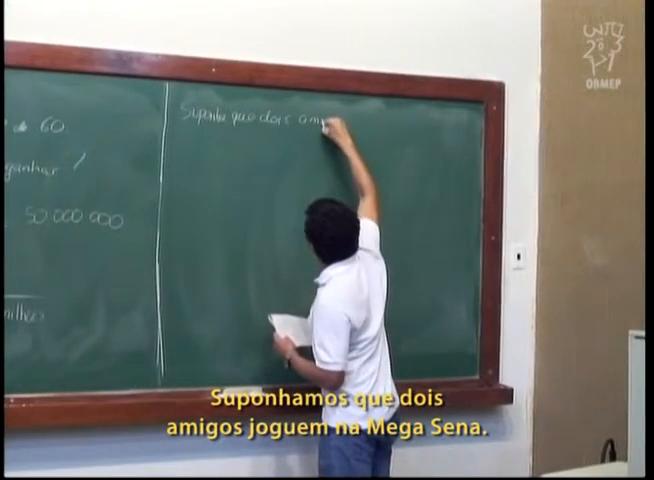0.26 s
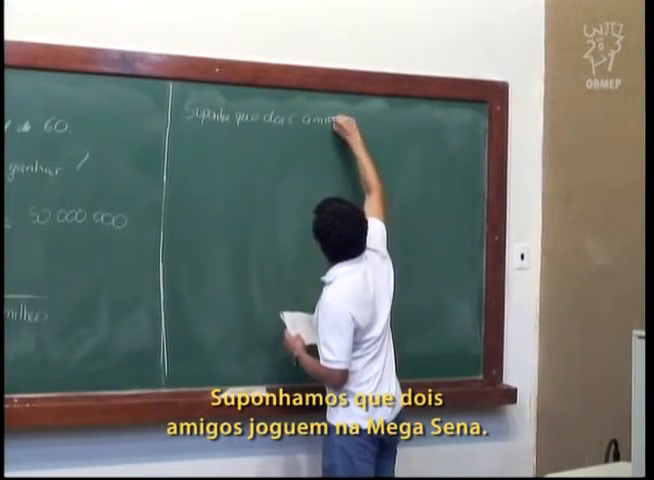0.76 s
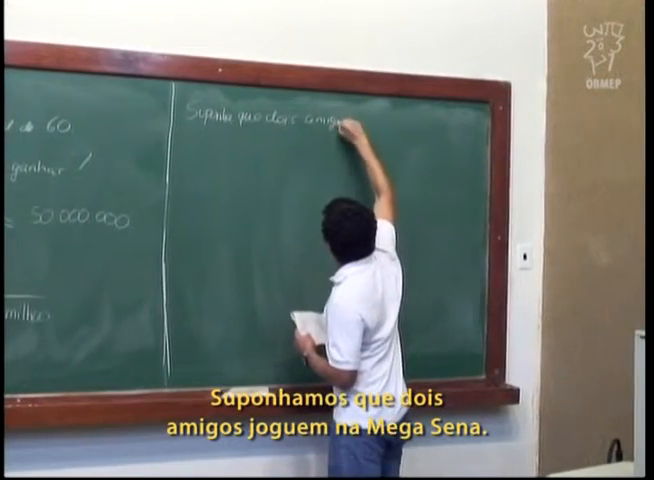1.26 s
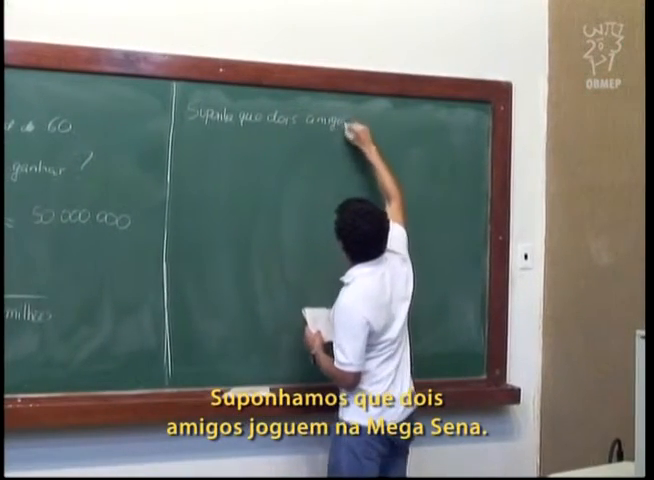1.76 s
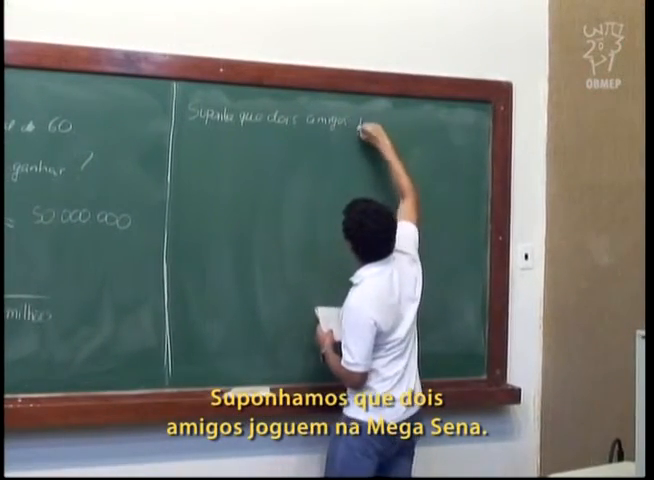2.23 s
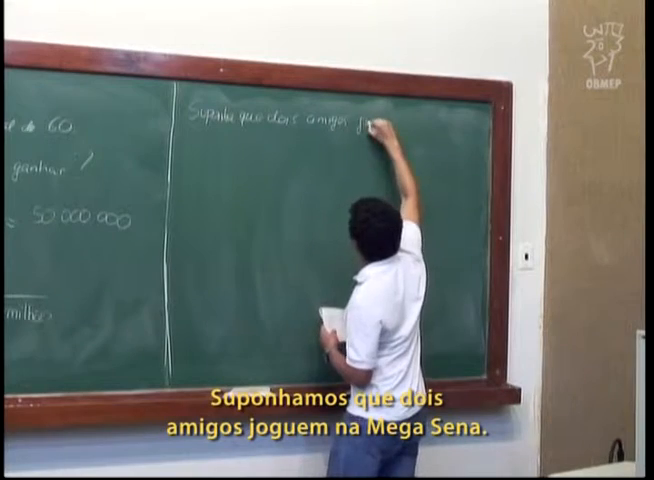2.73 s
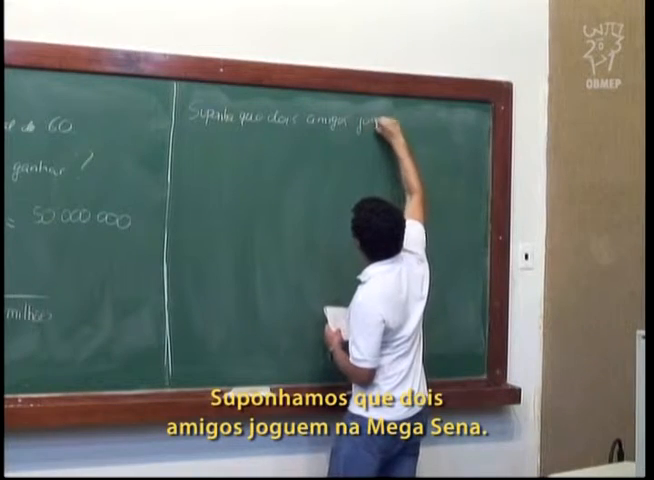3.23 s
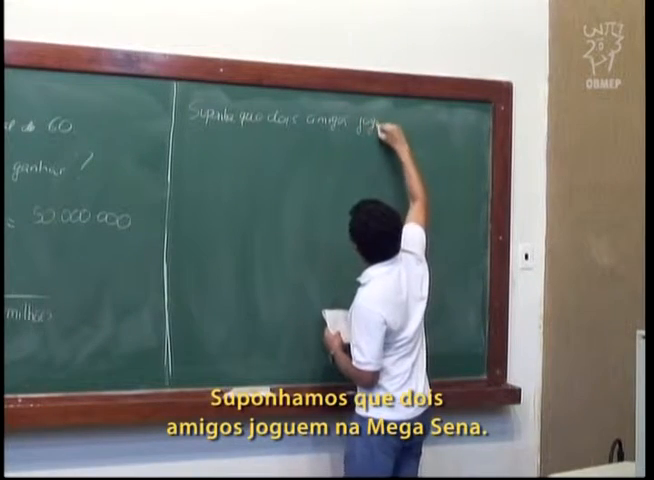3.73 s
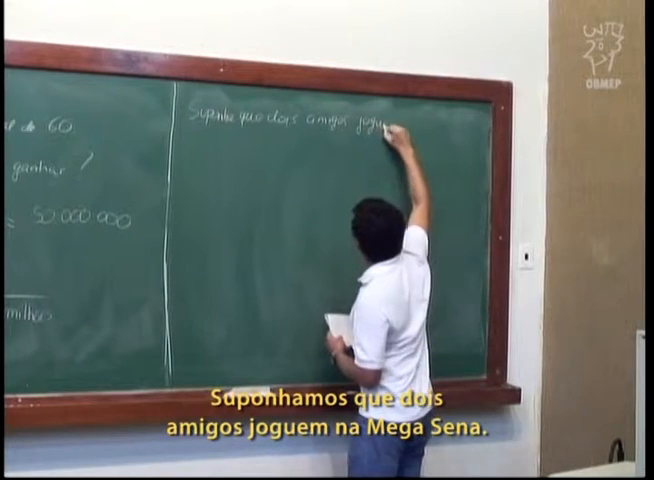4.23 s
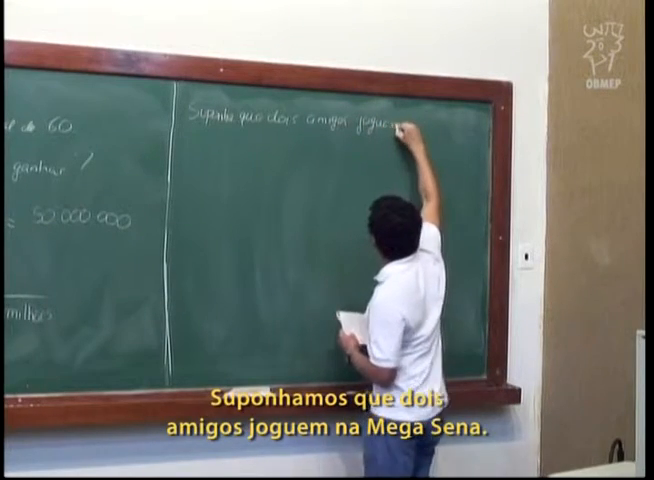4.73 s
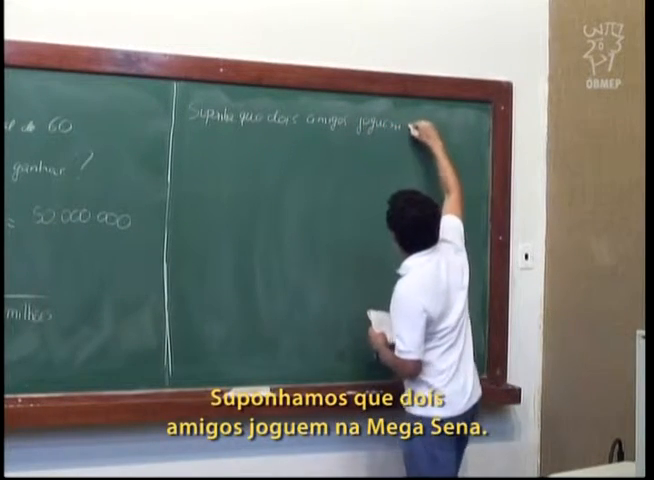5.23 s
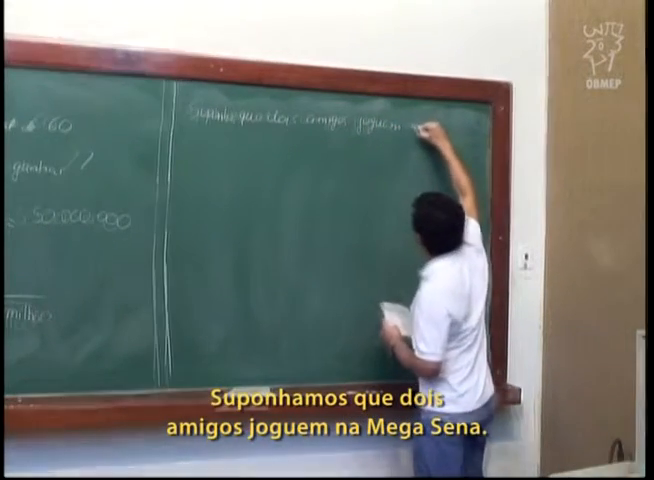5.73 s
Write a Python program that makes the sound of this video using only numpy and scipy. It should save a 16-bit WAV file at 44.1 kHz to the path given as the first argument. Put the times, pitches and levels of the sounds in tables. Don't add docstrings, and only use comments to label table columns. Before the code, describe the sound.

Chalk writes on a wall-mounted board in short dry scratches, with hard little knocks between strokes, in a quiet, faintly rumbling classroom.

```python
import sys
import numpy as np
from scipy import signal
from scipy.io import wavfile
from scipy.ndimage import uniform_filter1d

SR = 44100
rng = np.random.default_rng(int(sys.argv[2]) if len(sys.argv) > 2 else 0)


def file_out(sig):
    cols = np.atleast_2d(sig).T
    lim = np.clip(cols, -1, 1)
    pcm = np.round(lim * 32767).astype(np.int16)
    wavfile.write(sys.argv[1], SR, pcm)


def rack_gain(trim_db):
    fader = np.asarray(trim_db, float)
    return 10 ** (fader / 20)


N = 264159


def evened(x):
    return x / np.sqrt(np.mean(x ** 2) + 1e-20)


def smooth_noise(length):
    return uniform_filter1d(rng.standard_normal(N), length)


def read(points, hz):
    f, value = np.transpose(points)
    return np.interp(np.log(hz + 1), np.log(f + 1), value)


def add(mix, s, sound):
    part = mix[round(s * SR):][:len(sound)]
    part += sound[:len(part)]


def resonate(x, hz, width):
    turn = np.exp(2j * np.pi * np.cumsum(hz * np.ones(len(x))) / SR)
    r = np.exp(-np.pi * width / SR)
    smooth = signal.lfilter([(1 - r) ** 2], [1, -2 * r, r * r], x / turn)
    return 2 * (turn * smooth).real


def radiated(x):
    return signal.sosfilt(signal.butter(2, 190, "high", fs=SR, output="sos"), x)


# frequency in Hz, density in dB per Hz.
AIR = [(21, -60), (35, -3.5), (107, -2.5), (259, -14), (352, -19.5), (584, -19), (753, -22), (833, -27.5),
       (1020, -24.5), (1780, -32.5), (1970, -33), (10300, -43), (13600, -42), (15000, -57.5)]
# frequency in Hz, width in Hz, level in dB rms.
FAN = [(52.6, 36, -77), (75.3, 7.5, -59), (92.6, 29, -56.5), (117.7, 7.7, -57.5), (166, 14, -92),
       (235, 48, -67), (14500, 1500, -77), (15700, 300, -75)]
# frequency in Hz, level in dB rms.
SCAN = [(15194.8, -88), (15254.7, -89), (15314.7, -88), (15374.6, -86), (15434.6, -84), (15494.5, -84),
        (15554.4, -86), (15614.4, -83), (15674.3, -86), (15734.3, -73)]
AIR_DB = -44.5


def air():
    frames = N // 512 + 5
    hz, t = np.fft.rfftfreq(2048, 1 / SR), np.arange(N) / SR
    a, b, patches = rng.standard_normal((frames, 1025, 3)).T
    patches = evened(uniform_filter1d(uniform_filter1d(patches, 20, 0), 8, 1))
    z = (a + 1j * b) * rack_gain(read(AIR, hz)[:, None] + 1.46 * patches)
    hiss = rack_gain(AIR_DB - 4.5) * evened(signal.istft(z, nperseg=2048, noverlap=1536)[1][:N])
    fan = sum(rack_gain(db) * evened(resonate(rng.standard_normal(N), f, width)) for f, width, db in FAN)
    scan = sum(np.sqrt(2) * rack_gain(db) * np.sin(2 * np.pi * f * t) for f, db in SCAN)
    return hiss + fan + scan


def bump():
    out = np.zeros(N)
    u = np.arange(800) / SR * 700 * 2 * np.pi
    add(out, .0125, -rack_gain(-37) * u * np.exp(1 - u))
    return radiated(out)


# start in seconds, length in seconds, speed in dB, lean onto the stick in dB.
STROKES = [(.03, 0.095, -67, -1), (0.245, 0.089, -69, 1), (0.594, 0.098, -64, -2.5), (.68, .1, -66, -6),
           (0.816, 0.12, -65, 1), (0.933, 0.13, -65.5, -5.5), (1.201, 0.089, -64, -2),
           (1.283, 0.13, -62, -7), (1.613, 0.16, -63, -4.5), (2.001, 0.15, -62.5, -3),
           (2.144, 0.17, -63, -6), (2.613, 0.12, -64.5, -4.5), (2.72, .14, -64.5, -7),
           (3.026, 0.23, -65, -5), (3.263, 0.14, -62, -3.5), (3.4, 0.17, -64.5, -4.5),
           (3.695, 0.12, -68, 0), (3.793, 0.098, -63.5, -3.5), (3.915, 0.16, -66.5, -1),
           (4.171, 0.17, -64, -1.5), (4.4, 0.059, -65.5, -2), (4.567, 0.088, -66.5, -2),
           (4.662, 0.089, -65, -4), (4.75, 0.1, -65.5, -3), (4.855, 0.08, -62, -7.5),
           (4.94, 0.152, -65.5, -4), (5.307, 0.21, -64, -7), (5.53, 0.096, -66, -6), (5.626, 0.09, -65, -4),
           (5.727, 0.28, -65.5, -6)]
START_S, LIFT_S = 0.014, 0.01
GRIND_SHARE_DB, BOARD_SHARE_DB = -1.5, 3
DUST_SAG_DB, STICK_SAG_DB = -0.5, -2.5
SWELL_DB = 2.5


def glides():
    t, gains = np.arange(N) / SR, np.zeros((4, N))
    for s, length, speed_db, lean_db in STROKES:
        touching = np.clip(np.minimum((t - s) / START_S, (s + length - t) / LIFT_S), 0, 1)
        done = np.clip((t - s) / length, 0, 1) - .5
        shares_db = np.array([GRIND_SHARE_DB + 0 * t,
                              GRIND_SHARE_DB + BOARD_SHARE_DB + 0 * t,
                              lean_db + STICK_SAG_DB * done,
                              DUST_SAG_DB * done])
        gains += touching * rack_gain(speed_db - 3.8 * SWELL_DB * done ** 2 + shares_db)
    return gains


# peak in seconds, build-up in seconds, pressure in dB, board share in dB.
BITES = [(.15, .02, -64, -10), (.61, 0.054, -63.5, 5), (.755, 0.044, -60, -2), (.85, 0.071, -57.5, -3),
         (1.063, .03, -53, 6), (1.228, 0.024, -57, 3), (1.35, .05, -65, 9), (1.434, 0.042, -56.5, 8.5),
         (1.63, 0.041, -58.5, 5.5), (1.768, 0.021, -64, 4), (2.2, 0.013, -62, 10.5),
         (2.305, 0.018, -55, 6.5), (2.845, .04, -68, 11), (3.09, 0.046, -61.5, 4.5), (3.557, 0.035, -66, 0),
         (3.85, 0.13, -67.5, 7.5), (4.062, 0.015, -56, 4), (4.201, .03, -62, 7), (4.322, 0.031, -62, -14),
         (4.713, 0.047, -60.5, 3), (4.89, 0.055, -62.5, 3), (4.96, 0.085, -68.5, 10),
         (5.068, 0.24, -67.5, 10), (5.2, 0.12, -72, 5), (5.345, .02, -58, -8), (5.4, 0.08, -54, -1),
         (5.55, 0.025, -63.5, 3), (5.585, 0.042, -71.5, 16), (5.765, 0.057, -57.5, 0), (5.83, 0.11, -65, 8)]
BUILD_DB, LET_GO_S, BITE_STICK_DB, BITE_DUST_DB = 15, 0.013, -7.5, -13


def bites(gains):
    t = np.arange(N) / SR
    for s, build, pressure_db, board_db in BITES:
        press = rack_gain(pressure_db - BUILD_DB * (np.maximum(s - t, 0) / build) ** 2)
        press *= np.clip(1 + (s - t) / LET_GO_S, 0, 1)
        shares_db = np.array([[0], [board_db], [BITE_STICK_DB], [BITE_DUST_DB]])
        gains = np.hypot(gains, press * rack_gain(shares_db))
    return gains


# frequency in Hz, width in Hz, level in dB.
GRIND_BAND = [(2350, 1030, 9), (3660, 1150, 13.5), (4830, 870, 1.5), (6360, 2700, 7)]
BOARD_BAND = [(692, 1040, -4.5), (1230, 370, -3), (1950, 1100, -6)]
STICK_BAND = [(7550, 930, 8), (8930, 1700, 7), (10400, 1200, -2)]
DUST_BAND = [(11700, 3100, -6), (13500, 1100, -1.5), (14900, 1200, -4)]
TILT = .02
GRAINS_HZ = 9000


def strokes():
    clumps = rack_gain(0.89 * evened(smooth_noise(300)))
    tilt = 1 + TILT * evened(uniform_filter1d(smooth_noise(4000), 4000))
    out = np.zeros(N)
    for gain, band in zip(bites(glides()), [GRIND_BAND, BOARD_BAND, STICK_BAND, DUST_BAND]):
        grains = clumps * rng.standard_normal(N) * (rng.random(N) < GRAINS_HZ / SR)
        voice = np.zeros(N)
        for k, (hz, width, db) in enumerate(band):
            wander = rack_gain(2.5 * evened(smooth_noise(1500)))
            voice += (-1) ** k * rack_gain(db) * wander * evened(resonate(grains, hz * tilt, width))
        out += gain * evened(voice)
    return out


def ring(modes, rise_s, scatter_db, scatter):
    t = np.maximum(np.arange(8000) / SR - .0005, 0)
    out = np.zeros(len(t))
    for hz, db, t60 in modes:
        a, b = rng.standard_normal(2)
        fade = rack_gain(db + scatter_db * a - 60 * t / t60)
        out -= fade * np.cos(2 * np.pi * hz * (1 + scatter * b) * t)
    return out * (1 - np.exp(-(t / rise_s) ** 2))


# start in seconds, blow in dB, contact pitch in Hz, low panel in dB, tip hardness in dB.
TAPS = [(0.2223, -14, 1400, -11.5, -5.5), (0.4276, -12, 1470, -10.5, -7.5),
        (0.5284, -28.5, 1400, -14, -5.5), (1.1692, -16, 1480, -9, -13), (1.5632, -15.5, 1530, -18, -15.5),
        (1.958, -13, 1550, -15.5, -16), (2.4364, -5.5, 1470, -12, -14.5), (2.5912, -13, 1440, -10.5, -10.5),
        (2.9782, -14, 1390, -11.5, -7.5), (3.6604, -12, 1400, -14, -9.5), (4.126, -18.5, 1510, -14, -11),
        (4.3886, -16.5, 1560, -19.5, -5), (4.5349, -18, 1370, -20.5, -3), (5.2811, -18, 1330, -12.5, -15.5)]
# start in seconds, panel ring in dB,
# lean to upper modes in dB per octave, grip on the stick in dB.
SPOTS = [(.222, 0, -6, -3), (.428, 0, 2, -1), (.528, -0.5, 2, 4.5), (1.169, 0.5, -23, -3),
         (1.563, -1.5, 5, -1), (1.958, 0, 4, 0), (2.436, -1, -14, 1.5), (2.591, -2.5, 3, 1),
         (2.978, 0, -1, -4), (3.66, 2.5, -8, 0), (4.126, 3, -25, -3), (4.388, 3.5, -14, 1),
         (4.535, 1, -16, -0.5), (5.281, 0, -1, -10)]
# frequency in Hz, level in dB, 60 dB decay in seconds.
PANEL = [(1170, -3, 0.016), (1370, -6, 0.022), (1700, -9, 0.009), (2100, -11, 0.01)]
LOW_PANEL = [(268, -1.5, 0.0054), (505, -6, 0.02), (571, -13, 0.073), (808, 8, 0.025)]
TIP = [(2800, -8, .006), (3250, -.5, .009), (3700, -1, .008), (4300, -2, .008), (4900, -6, .006),
       (5600, -17, .005)]
STICK = [(7300, -6, .007), (8200, -.5, .008), (9100, -4, .007), (10100, -3, .007), (11300, -5, .006),
         (12700, -6, .006), (14500, -8, .005)]
BACKING = [(1290, -31, 0.18), (1350, -32, 0.15)]
RING_DB, RING_PER_BLOW = -13, 0.83
STICK_DB, STICK_PER_HARD, STICK_PER_BLOW = -24, 0.98, .7
SOFTEST_TIP_DB = -20


def taps():
    blows, rings = np.zeros((2, N))
    for (s, db, hz, low_db, tip_db), (_, spot_db, lean_db, grip_db) in zip(TAPS, SPOTS):
        strength = db + 14
        stick_db = STICK_DB + STICK_PER_HARD * (tip_db + 11) + STICK_PER_BLOW * strength + grip_db
        tip_db = max(tip_db - .6, SOFTEST_TIP_DB)
        ring_db = RING_DB + RING_PER_BLOW * strength + spot_db + 1.5
        panel = [(f, d + lean_db * np.log2(f / PANEL[0][0]), t60) for f, d, t60 in PANEL]
        u = (np.arange(8000) / SR - .001) * hz
        knock = np.exp(-(u / .5) ** 2) * np.cos(2 * np.pi * u - .3)
        knock += rack_gain(low_db - 7.0) * ring(LOW_PANEL, rise_s=.0005, scatter_db=4.0, scatter=0.039)
        knock += rack_gain(tip_db) * ring(TIP, rise_s=.0002, scatter_db=1.5, scatter=.04)
        knock += rack_gain(stick_db + 2.0) * ring(STICK, rise_s=.0001, scatter_db=1.5, scatter=.03)
        add(blows, s - .0006, rack_gain(db + 2.0) * knock)
        ringing = ring(panel + BACKING, rise_s=.0005, scatter_db=1.0, scatter=0.0308)
        add(rings, s - .0006, rack_gain(ring_db) * ringing)
    return radiated(blows), radiated(rings)


# delay in seconds, level in dB.
ECHOES = [(.0085, -19.5), (.015, -44), (.026, -46), (.037, -42), (.076, -36), (.081, -36)]
# frequency in Hz, 60 dB decay in seconds.
ROOM = [(200, 0.57), (700, 0.31), (1400, 0.45), (2500, 0.27), (5000, 0.12), (10000, 0.15)]
# frequency in Hz, level in dB.
ROOM_TONE = [(200, 9.5), (800, -1.5), (1350, 2.5), (2300, -5.5), (5000, 1.5), (8000, 2), (12000, -5.5)]
ROOM_DB = -14.5


def room(x):
    early = np.zeros(SR // 10)
    for s, db in ECHOES:
        early[round(s * SR)] = rack_gain(db)
    late, t = np.zeros(N), np.arange(N) / SR
    for k in range(3):
        sparse = np.zeros(SR // 2)
        at = np.arange(100, SR // 2 - 20, 20)
        sparse[at + rng.integers(0, 20, len(at))] = rng.choice([-1., 1.], len(at))
        hz, age, z = signal.stft(sparse, SR, nperseg=256)
        fade_db = read(ROOM_TONE, hz)[:, None] - 60 * age / read(ROOM, hz)[:, None]
        tail = signal.istft(z * rack_gain(fade_db), SR, nperseg=256)[1]
        turn = np.sqrt(2 / 3) * np.cos(np.pi * (t * 1.7 + k / 3))
        late += signal.oaconvolve(x * turn, tail / np.linalg.norm(tail))[:N]
    dull = resonate(x, 970, 4600)
    return signal.oaconvolve(dull, early)[:N] + rack_gain(ROOM_DB) * late


def scene():
    quiet, grind = air(), strokes()
    blows, rings = taps()
    blows = blows + bump()
    heard = quiet + blows + rings + grind + room(blows + 0.081 * rings + 0.5 * grind)
    return np.array([heard, heard])


def top_cut(x):
    return signal.sosfilt(signal.butter(12, 16990, fs=SR, output="sos"), x)


LEFT_DB, RIGHT_DB, BASS_CUT_HZ = 1.3, -1.55, 48
EDGE_HZ, KNOCK_EDGE_HZ, MONO_ABOVE_HZ = 15800, 16700, 7300
LOUD_DB, FAINT_DB = -74, -101


def record(dry):
    dry = signal.sosfilt(signal.butter(3, BASS_CUT_HZ, "high", fs=SR, output="sos"), dry)
    left, right = dry * rack_gain([[LEFT_DB], [RIGHT_DB]])
    hz, _, z = signal.stft((left - right) / 2, SR, nperseg=1024)
    hz = hz[:, None]
    power = uniform_filter1d(uniform_filter1d(abs(z) ** 2, size=16, axis=0), size=3, axis=1)
    z = z * ((power > rack_gain(2 * FAINT_DB + (hz > 15000) * 30)) | (hz < MONO_ABOVE_HZ))
    both = np.array([(left + right) / 2, signal.istft(z, SR, nperseg=1024)[1][:N]])

    def below(edge):
        lowpass = signal.firwin(1023, edge, window=("kaiser", 7), fs=SR)
        return signal.oaconvolve(both, lowpass[None], "same")

    kept = below(EDGE_HZ)
    top = below(KNOCK_EDGE_HZ) - kept
    loud = np.clip(uniform_filter1d(top[0] ** 2, size=256) / rack_gain(2 * LOUD_DB) - 1, 0, 1)
    mid, side = kept + rack_gain(-7) * loud * top
    return top_cut(np.array([mid + side, mid - side]))


dry = scene()
out = record(dry)
file_out(out)
```